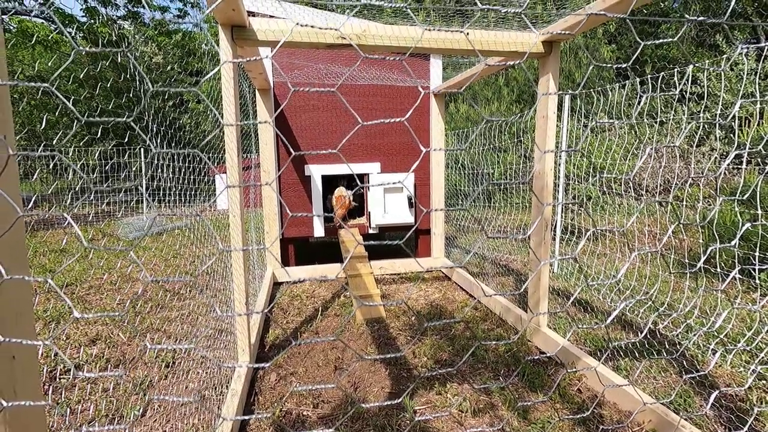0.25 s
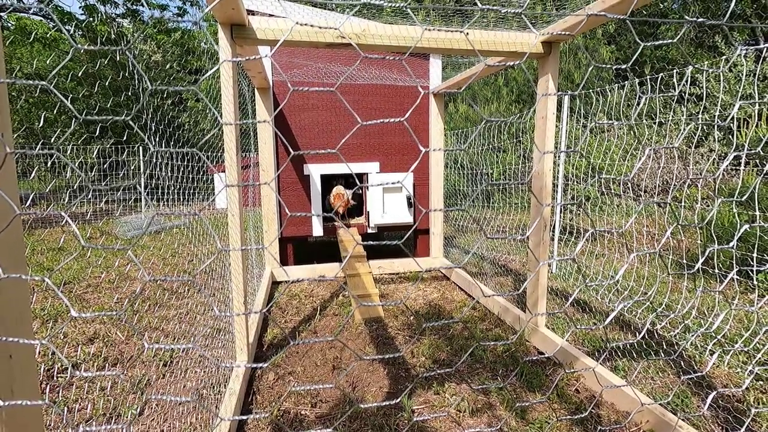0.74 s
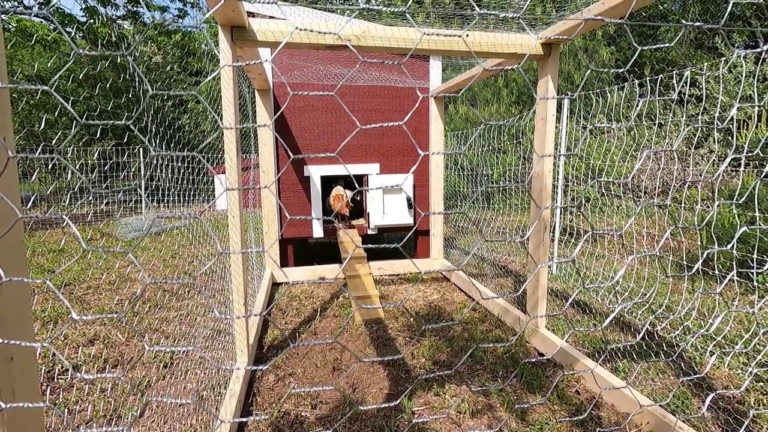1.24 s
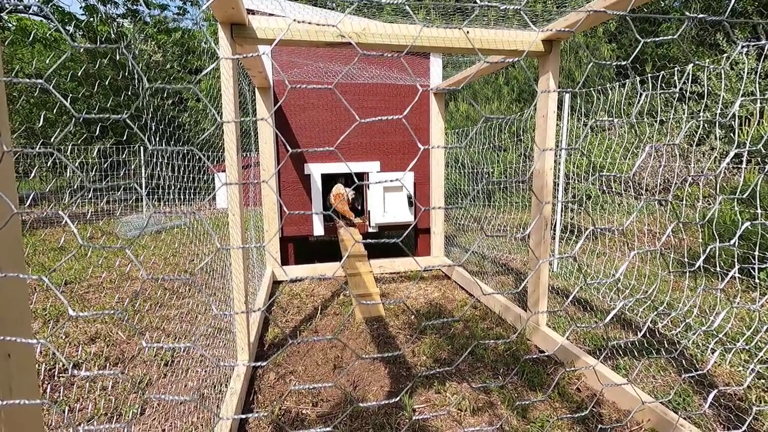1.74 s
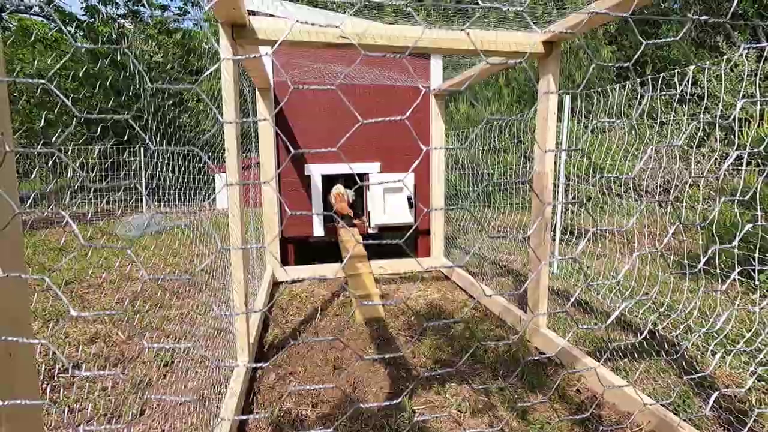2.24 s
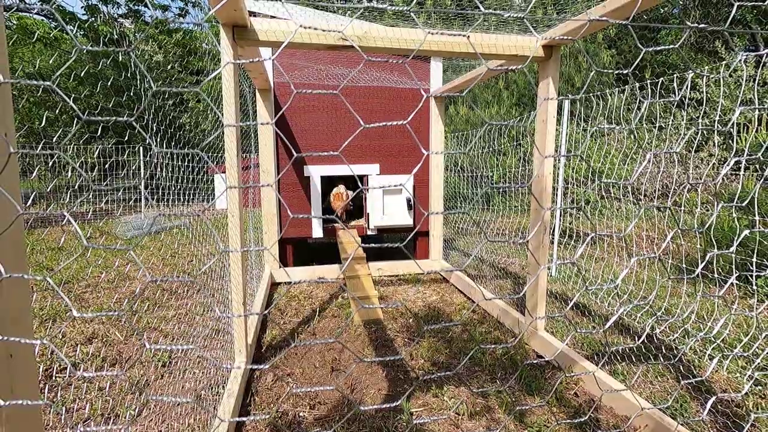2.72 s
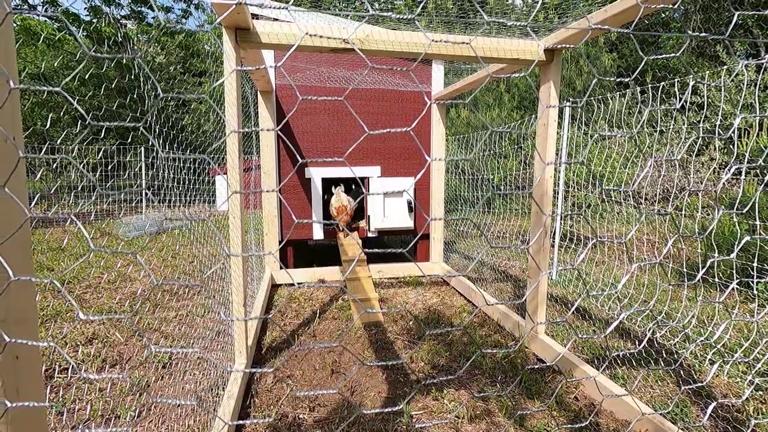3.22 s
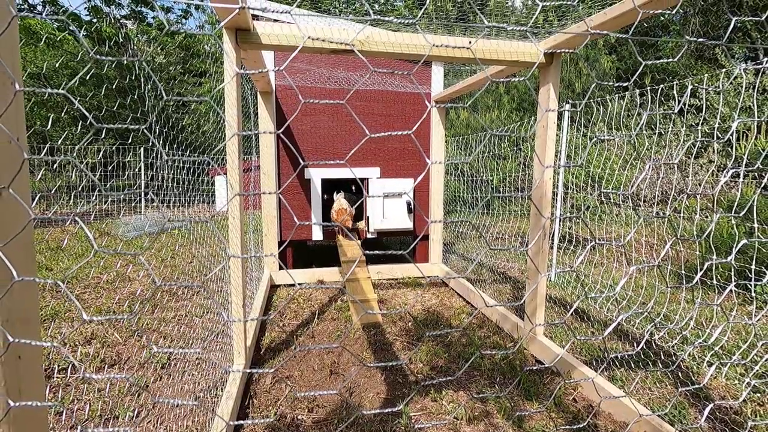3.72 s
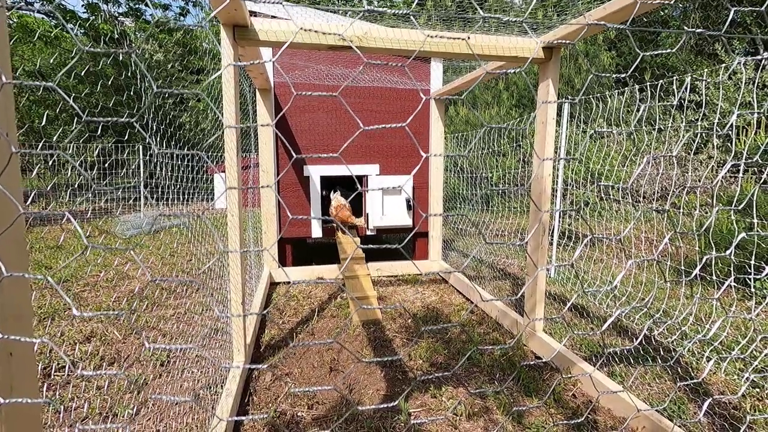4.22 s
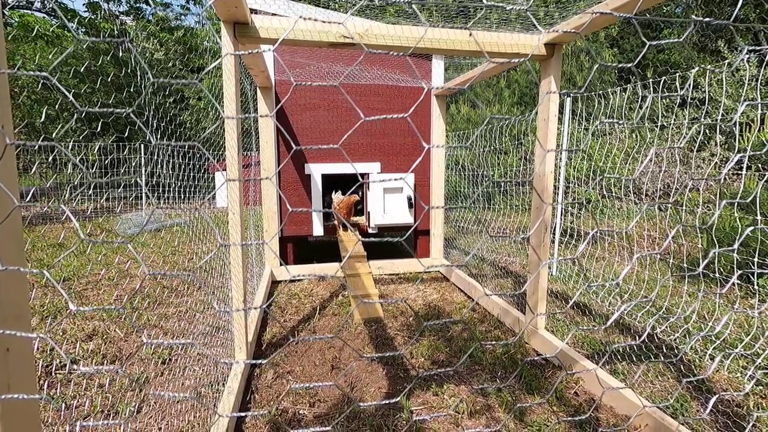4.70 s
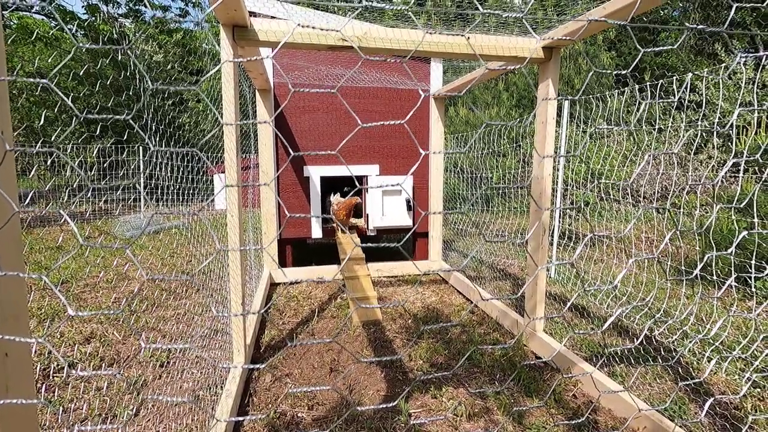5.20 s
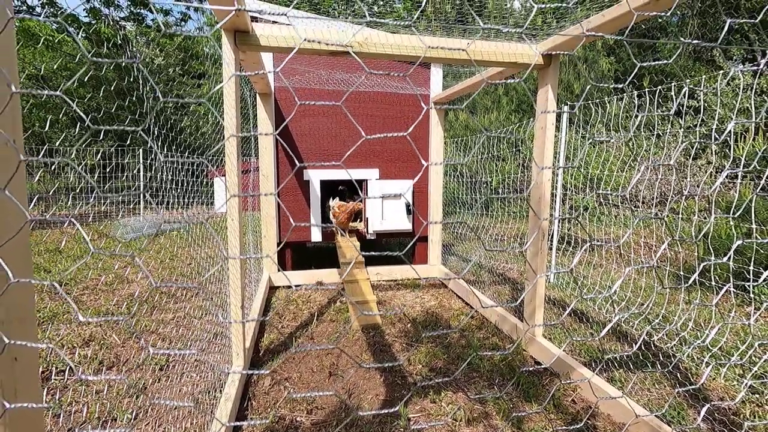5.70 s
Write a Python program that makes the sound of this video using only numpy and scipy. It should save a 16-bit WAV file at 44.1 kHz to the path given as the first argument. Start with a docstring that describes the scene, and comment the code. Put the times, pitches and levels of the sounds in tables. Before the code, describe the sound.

Overlapping short chick cheeps and soft peeps, light taps and litter scratches, over rustling foliage, faint cricket, distant engine hum and microphone wind.

```python
'''In and around a small wooden coop, young chickens peep and cheep; claws and beaks tick and scratch on the boards.
Each call is a gliding near-sine with overtones, buzz and hiss; taps are noise ticks with ringing boards.
Scratches are bursts of crackling noise over a soft boom, and the box adds quick reflections to calls and taps.
Outdoors, filtered noise makes rustling leaves, a cricket near 5 kHz and light wind rumbling on the microphone;
a far engine hums on one wavering tone.'''
import sys
import numpy as np
from scipy import signal
from scipy.fft import rfft, irfft, next_fast_len
from scipy.io import wavfile
from scipy.ndimage import uniform_filter1d, map_coordinates

SR = 44100
rng = np.random.default_rng(int(sys.argv[2]) if len(sys.argv) > 2 else 0)


def persist_wave(psi):
    """Save psi, clipped to +-1, as 16-bit WAV."""
    counts = np.round(np.clip(psi, -1, 1) * 32767).astype(np.int16)
    wavfile.write(sys.argv[1], SR, np.atleast_2d(counts).T)


N = 262388
TIME = np.arange(N) / SR  # s

# bright spectrum of claws and beaks on wood and litter: f/Hz, relative level/dB
CLAW = [(1500, -17), (3000, 5), (5000, 1.5), (7000, 0.5), (9500, -9), (12500, -10)]


def from_db(db):
    """Decibels to gain."""
    return 10 ** (np.asarray(db) / 20)


def rms_one(x):
    """Scale to unit rms."""
    return x / np.sqrt(np.mean(x ** 2) + 1e-20)


def in_time(rows):
    """Draw each column of an automation curve at every sample."""
    s, *columns = np.transpose(rows)
    return [np.interp(TIME, s, c) for c in columns]


def at_hz(points, hz):
    """Read a spectrum on a log-frequency axis."""
    f, value = np.transpose(points)
    return np.interp(np.log(hz + 1e-6), np.log(f), value)


def drift(rate, size=N):
    """Random modulator of spread 1, gliding to a new value rate times a second."""
    steps = np.arange(size) * rate / SR
    values = rng.standard_normal(size // 8 + 9)
    # straight glides between values shrink the spread, so restore it
    return map_coordinates(values, [steps + 2], order=1, mode="wrap") * np.sqrt(3 / 2)


def colour(x, spectrum):
    """Filter by a spectrum that falls away steeply past its ends."""
    size = next_fast_len(N)
    hz = np.arange(size // 2 + 1) * SR / size + 1e-3
    low_end = 1 + (.8 * spectrum[0][0] / hz) ** 8
    high_end = 1 + (.8 * hz / spectrum[-1][0]) ** 8
    gain = from_db(at_hz(spectrum, hz)) / np.sqrt(low_end * high_end)
    return irfft(rfft(x, size) * gain, size)[..., :N]


def diffuse(spectrum, grain_db=0):
    """Stereo noise of rms 1, alike in the bass and wider above; grain makes it crackle."""
    # likeness of left and right: f/Hz, correlation/1
    likeness = [(60, 1), (125, 0.99), (250, 0.88), (500, 0.57), (1000, 0.79), (2000, 0.3), (4000, 0.46),
                (12000, 0.62)]
    grains = rng.standard_normal((2, N)) * from_db(grain_db * drift(900))
    mid, side = colour(grains, spectrum)
    width = [(hz, 10 * np.log10((1 - min(c, .999)) / (1 + c))) for hz, c in likeness]
    side = colour(side, [(10, width[0][1])] + width)
    return rms_one(mid + side * np.array([[1], [-1]]))


def add(track, start, sound):
    """Mix a sound into a track at a time in seconds."""
    i = max(round(start * SR), 0)
    track[i:i + len(sound)] += sound[:max(N - i, 0)]


def progress(length):
    """From 0 to 1 over a length in seconds."""
    return np.linspace(0, 1, int(length * SR))


def swell(u, loudest_at, ends_db):
    """A call's effort in dB: up to its loudest moment and down again."""
    return np.interp(u, [0, np.clip(loudest_at, .02, .98), 1], [ends_db[0], 0, ends_db[1]])


def chicks():
    """All the birds' calls overlap freely and share the colour of throat and beak."""
    # how throat and beak colour the voice: f/Hz, gain/dB
    beak = [(900, 2), (3800, -2), (5000, -2), (6800, -3), (8600, -4), (9800, -9.5), (11500, 1.5),
            (13000, -19)]
    return colour(arched_peeps() + falling_cheeps() + twisting_pips(), beak)


def falling_cheeps():
    """Cheeps start high and slide down in one slightly bowed line."""
    # cheeps: t/s, length/s, start f/Hz, end f/Hz, bow of the glide/Hz, nominal level/dB,
    # loudest moment/0-1, nominal overtones/dB, rasp/0-1
    cheeps = [(0, 0.038, 2550, 2250, 30, -58, .3, -22, 0.04),
              (0.634, 0.12, 4230, 2310, -330, -41, .48, -17, .25),
              (.933, 0.049, 2970, 1980, -170, -41, 0.67, -25, 0.24),
              (1.144, 0.063, 2870, 2030, -130, -44, .5, -16, 0.7),
              (1.624, .11, 3850, 2295, -140, -40.5, 0.71, -9, .36),
              (1.77, 0.042, 3060, 2210, 100, -52, .6, -24, 0.4),
              (2.028, 0.026, 2890, 2050, 30, -49, .4, -7, 0.2),
              (2.3, 0.14, 4200, 1995, -40, -45.5, 0.41, -12, 0.24),
              (2.545, 0.065, 4700, 4230, 0, -52, 0.65, -28, .6),
              (2.598, .08, 4470, 2150, 29, -41, 0.9, -23, 0.33),
              (2.7, 0.071, 3150, 2280, 98, -45, 0.75, -18, 0.08),
              (2.978, 0.05, 2890, 1980, -170, -46, 0.66, -14, 0.3),
              (3.025, 0.064, 2930, 2240, -130, -37.5, 0.66, -18, .6),
              (3.035, 0.089, 5000, 3730, -74, -48, 0.9, -25, 0.8),
              (3.088, 0.11, 3800, 2360, -190, -37.5, 0.64, -10.5, 0.3),
              (3.287, 0.074, 5000, 3200, 203, -45, 1, -26, .85),
              (3.34, 0.026, 2050, 1830, -30, -36, .24, -20, .22),
              (3.361, .038, 3320, 2640, 140, -33.5, 0.62, -24, 0.27),
              (3.549, 0.097, 4220, 2210, 253, -39, .72, -25, 0.5),
              (3.991, 0.017, 2304, 1650, 0, -42.5, 0.75, -18, 0.55),
              (4.071, 0.056, 3100, 2690, 70, -46, 0.5, -17, 0.2),
              (4.084, 0.14, 3430, 2760, 104, -49, 0.2, -14, 0.05),
              (4.21, .049, 2750, 1765, 93, -34.5, 0.41, -13, 0.39),
              (4.455, 0.038, 2420, 1362, 24, -42.5, 0.94, -11, 0.7),
              (4.608, 0.07, 3510, 1900, -19, -42.5, 0.3, -12, 0.58),
              (4.65, 0.039, 3560, 2160, 128, -45, 0.15, -7, 0.5),
              (4.808, .011, 2160, 1950, -20, -45.5, 0.3, -29, 0),
              (5.191, 0.032, 1860, 1650, 110, -41, 0.57, -20, 0.1),
              (5.252, .07, 2840, 2400, -60, -48, 0, -12, .3),
              (5.456, 0.068, 3680, 2450, -56, -44, 0.97, -11.5, 0.65),
              (5.61, 0.041, 2810, 2130, 20, -39, 0.4, -22, 0.34),
              (5.854, 0.032, 2920, 2240, 0, -49.5, 0.15, -24, 0.45),
              (5.909, 0.039, 2900, 1950, 0, -48, 0.44, -24, 0.66)]
    out = np.zeros(N)
    for start, length, from_hz, to_hz, bow_hz, db, loudest_at, overtone_db, rasp in cheeps:
        u = progress(length)
        hz = from_hz + (to_hz - from_hz) * u + bow_hz * np.sin(np.pi * u)
        level_db = db + swell(u, loudest_at, (-13.5, -11))
        add(out, start, peep(hz, level_db, overtone_db, rasp))
    return out


def arched_peeps():
    """Soft peeps scoop up towards a top pitch, then droop ever faster."""
    # peeps: t/s, length/s, nominal top f/Hz, scoop up to it/Hz, final fall/Hz, nominal level/dB,
    # loudest moment/0-1, nominal overtones/dB, rasp/0-1
    peeps = [(0.129, 0.17, 3064, 498, 1000, -52.5, 0.8, -30, 0.28),
             (.742, 0.039, 1295, 0, 20, -47, 0.5, -30, 0.43),
             (0.908, .02, 2960, 1100, 0, -51, 0.4, -23, .1),
             (1.671, .072, 3610, 200, 430, -49, 0.78, -31, 0),
             (1.902, 0.11, 3770, 698, 700, -50, 0.8, -33, 0),
             (2.909, 0.15, 3570, 2000, 280, -55.5, 0, -11, 0.05),
             (2.969, 0.056, 3110, 500, 448, -46.5, 0.85, -21, 0.3),
             (3.185, 0.1, 3330, 900, 950, -48.5, 0.17, -15, .02),
             (3.367, .014, 3350, 2100, 0, -37, .12, -21, .55),
             (3.399, 0.019, 2880, 700, 0, -44, 0.1, -21, .4),
             (3.51, .085, 3200, 1400, 400, -53, 0, -18, .4),
             (3.741, 0.16, 3680, 1200, 1600, -47.5, 0.5, -27, 0.15),
             (3.922, 0.07, 2660, 300, 400, -53, 0.54, -4.5, 0.4),
             (4.069, 0.11, 3810, 0, 300, -54, 0.2, -20, 0.08),
             (4.134, 0.074, 2760, 200, 480, -52.5, 0.5, -16, 0.33),
             (4.312, 0.055, 2750, 290, 400, -50, 0.6, -18, 0.3),
             (4.725, 0.071, 2900, 300, 430, -47, 0.6, -20, 0),
             (4.942, 0.064, 2270, 250, 40, -46.5, 0.9, -21, 0.43),
             (5.137, .096, 3003, 1351, 680, -44.5, 0.25, -29, 0.16),
             (5.263, 0.091, 3215, 600, 950, -47.5, 0.65, -19, 0.23),
             (5.506, .112, 3100, 1396, 430, -51, 1, -13, 0.27),
             (5.65, 0.096, 2590, 450, 600, -50.5, 0.64, -11, 0.8),
             (5.753, 0.12, 3770, 1302, 1148, -52, .7, -17, 0.3),
             (5.853, 0.087, 3020, 300, 380, -48, 0.4, -26, 0.27)]
    scoop_s, fall_power = .0075, 3.2
    out = np.zeros(N)
    for start, length, top_hz, scoop_hz, fall_hz, db, loudest_at, overtone_db, rasp in peeps:
        u = progress(length)
        hz = top_hz - scoop_hz * np.exp(-u * length / scoop_s) - fall_hz * u ** fall_power
        level_db = db + swell(u, loudest_at, (-6.5, -7))
        add(out, start, peep(hz, level_db, overtone_db, rasp))
    return out


def twisting_pips(flick_hz_per_s=46000, hook_hz_per_s=65500, loudest_at=0.83):
    """Pips flick up to a crest, drop to a trough and hook upward; the upward moves have fixed speeds."""
    # pips: t/s, flick/s, drop/s, hook/s, crest f/Hz, trough f/Hz, easing of the drop/power,
    # nominal level/dB, nominal overtones/dB, rasp/0-1
    pips = [(.117, 0.0093, 0.028, 0.013, 2120, 1847, 1.8, -43, -36, .13),
            (1.301, 0.0093, .04, 0.011, 2900, 2040, 2.1, -39.5, -16, 0.1),
            (2.107, 0.0085, 0.051, .004, 2900, 2020, 3.3, -44, -23, 0.14),
            (2.634, 0.00334, .039, 0.019, 2520, 1612, 1, -38, -12.5, 0.45),
            (4.53, 0.018, 0.03, 0.0024, 2720, 2040, 1.04, -43, -14.5, 0.08)]
    out = np.zeros(N)
    for start, flick_s, drop_s, hook_s, crest_hz, trough_hz, easing, db, overtone_db, rasp in pips:
        length = flick_s + drop_s + hook_s
        u = progress(length)
        t = u * length - flick_s  # zero at the crest
        hz = trough_hz + (crest_hz - trough_hz) * np.clip(1 - t / drop_s, 0, 1) ** easing
        hz += flick_hz_per_s * np.minimum(t, 0) + hook_hz_per_s * np.maximum(t - drop_s, 0)
        level_db = db + swell(u, loudest_at, (-4.5, -10.5))
        add(out, start, peep(hz, level_db, overtone_db, rasp))
    return out


def peep(hz, level_db, overtone_db, rasp):
    """One whistle of the syrinx: a gliding near-sine that trembles when hoarse and turns to hiss when high."""
    # overtones from the octave upward: relative level/dB
    overtones = [-3, -8.5, -12, -37]
    # the call rings out as its pitch passes these resonances: f/Hz, gain/dB
    resonances = [(1400, 5), (1750, -2), (2050, 3.5), (2400, 0), (2750, 0.5), (3050, 1.5), (3600, -2.5),
                  (5000, 1.5)]
    quaver, quaver_rate, jitter, rasp_rate = 0.0048, 170, 0.051, 520  # fractions of the pitch, changes per s
    flutter_db, flutter_rate, shimmer_db = 2.2, 170, 5.5
    bloom, mellowing, overtone_flutter_db = 0.15, .22, 4.5
    airy_hz, airy_span_hz, edge_s = 3300, 3000, 0.0033
    buzz_hz, buzz_depth = 483, 0.55
    size, rasp = len(hz), np.clip(rasp, 0, 1)
    t = TIME[:size]

    tremble = quaver * drift(quaver_rate, size) + jitter * rasp * drift(rasp_rate, size)
    phase = 2 * np.pi * np.cumsum(hz * (1 + tremble)) / SR
    level_db = level_db + at_hz(resonances, hz) + flutter_db * np.tanh(drift(flutter_rate, size))

    # overtones bloom where the bird pushes hardest
    bright_db = overtone_db + bloom * (level_db - level_db.max())
    tone = np.sin(phase)
    for k, db in enumerate(overtones):
        flutter = overtone_flutter_db * np.tanh(drift(184, size))
        tone += from_db(bright_db * (1 + mellowing * k) + db + flutter) * np.sin((k + 2) * phase)

    # hiss is noise centred on the whistle's own pitch
    airy = np.clip(rasp * (0.051 + 10 * np.maximum(hz - airy_hz, 0) / airy_span_hz), 0, .95)
    hiss = (drift(1700, size) * np.sin(phase) + drift(1700, size) * np.cos(phase)) / np.sqrt(2)
    voice = np.sqrt(1 - airy) * tone + np.sqrt(airy) * hiss

    # a hoarse syrinx also buzzes, which splits the whistle into parallel strands
    buzz = np.sin(2 * np.pi * np.cumsum(buzz_hz * (1 + 0.112 * drift(119.6, size))) / SR)
    voice = voice * (1 + buzz_depth * rasp * buzz)

    edges = np.sin(np.pi / 2 * np.clip(np.minimum(t, t[-1] - t) / edge_s, 0, 1))
    shimmer = shimmer_db * rasp * (np.tanh(drift(rasp_rate, size)) - 1.5)
    return voice * edges * from_db(level_db + shimmer)


def taps(tick_t60=0.018, crack_db=10, crack_t60=0.0028):
    """Each tap is a sharp crack, a bright tick and a short ring of the board, different with every blow."""
    # beak and claw blows: t/s, nominal tick level/dB, nominal board knock level/dB
    blows = [(.177, -55, -72), (.996, -63, -45.5), (1.184, -56, -70), (1.518, -52, -65), (2.044, -68, -68),
             (2.762, -55, -64), (2.818, -64, -62), (3.019, -54, -62), (3.296, -73, -51), (3.347, -60, -39),
             (3.367, -65, -46), (3.517, -72, -43), (4.0, -59, -55), (4.091, -59, -48), (4.657, -56, -63),
             (5.236, -62, -53), (5.485, -58.5, -73), (5.768, -58, -68)]
    # ring of the boards: f/Hz, relative level/dB, t60/s
    board = [(440, -17, 0.048), (694, -5.5, 0.014), (1280, -19, 0.014), (1600, -1, 0.011),
             (1970, -4, 0.051), (2770, -5.5, 0.025)]
    ticks, knocks, t = np.zeros(N), np.zeros(N), TIME[:SR // 10]
    fade = from_db(crack_db - 60 * t / crack_t60) + from_db(-60 * t / tick_t60)
    for start, tick_db, knock_db in blows:
        add(ticks, start, from_db(tick_db) * fade * rng.standard_normal(len(t)))
        for hz, db, t60 in board:
            ring_db = knock_db + db + rng.normal(0, 0.83) - 60 * t / t60
            ring = from_db(ring_db) * np.sin(2 * np.pi * hz * t)
            add(knocks, start, ring * rng.choice([-1, 1]))
    return colour(ticks, CLAW) + knocks


def scratches(boom_db=-4, boom_s=0.12):
    """Short strokes of crackling litter, under which the floor booms faintly."""
    # strokes: middle t/s, nominal length/s, level/dB
    strokes = [(1.196, 0.083, -63.5), (2.64, 0.076, -61), (2.74, 0.11, -64), (2.82, .04, -59.5),
               (3.03, 0.24, -69), (3.405, 0.46, -64), (3.596, 0.14, -83), (3.87, 0.18, -66),
               (4.086, 0.083, -55), (4.18, 0.074, -60), (4.39, 0.22, -68.5), (4.639, 0.11, -62.5),
               (5.21, 0.22, -68.5), (5.598, 0.47, -71)]
    # hollow boom of the coop floor: f/Hz, relative level/dB
    floor = [(190, -2.5), (260, 3.5), (340, -11)]
    stroke, boom_power = np.zeros(N), np.zeros(N)
    for middle, length, db in strokes:
        stroke += from_db(db) * np.exp(-2 * ((TIME - middle) / length * 1.83) ** 2)
        boom_power += from_db(db) ** 2 * np.exp(-((TIME - middle) / boom_s) ** 2)
    litter = stroke * diffuse(CLAW, grain_db=2.0)
    return litter + from_db(boom_db) * np.sqrt(boom_power) * diffuse(floor)


def coop(x, wet_db=-14, spread_db=-2, t60_s=0.11):
    """The bare wooden box adds a quick spray of reflections, partly different at each ear."""
    t = TIME[:SR // 4]
    sparse = rng.standard_normal((3, len(t))) * (rng.random((3, len(t))) < .05)
    echoes = sparse * from_db(-60 * t / t60_s) * (t > .002)
    echoes /= np.sqrt(np.sum(echoes ** 2, axis=1, keepdims=True))
    walls = echoes[0] + from_db(spread_db) * echoes[1:]  # one shared spray, one for each ear
    return x + from_db(wet_db) * signal.fftconvolve(x[None], walls, axes=1)[:, :N]


def placed(x):
    """Phase shifts make the coop's sound reach the right channel slightly before the left."""
    # phase by which the left channel leads (negative: lags): f/Hz, phase/rad
    lead_curve = [(500, -.1), (1800, -0.25), (3000, -0.73), (4500, -0.43), (8000, -0.82), (11000, -0.56)]
    size = next_fast_len(N)
    lead = at_hz(lead_curve, np.arange(size // 2 + 1) * SR / size)
    return irfft(rfft(x, size) * np.exp(.5j * lead * np.array([[1], [-1]])), size)[:, :N]


def wind(steadiness=0.5):
    """Low eddies at the microphone: a slowly changing draught with short buffets on top."""
    # rumble of the eddies: f/Hz, relative level/dB
    rumble = [(18, -17.5), (45, 1), (60, 1), (85, 2), (110, -7), (135, -7), (190, -22.5)]
    # draught between buffets: t/s, nominal level/dB
    draught = [(0, -56), (.08, -47), (.5, -45.5), (1.15, -42.5), (1.6, -47), (2, -47), (2.8, -49),
               (3.3, -46.5), (3.9, -48.5), (4.35, -41.5), (4.52, -53.5), (5.1, -46.5), (5.95, -45.5)]
    # single buffets: middle t/s, nominal level/dB
    buffets = [(.25, -42), (.7, -40), (.87, -43.5), (1.69, -41), (1.83, -41), (3.06, -42.5), (3.16, -41.5),
               (4.22, -42.5), (4.62, -40), (4.79, -44), (5.29, -38.5), (5.65, -34.5), (5.84, -38.5)]
    buffet_s = .036
    eddies = diffuse(rumble)
    # partly even out the noise's own swells, so the drawn levels lead
    strength = np.sqrt(uniform_filter1d(eddies[0] ** 2, size=SR // 12) + 1e-9)
    power = from_db(in_time(draught)[0]) ** 2
    for middle, db in buffets:
        power += from_db(db) ** 2 * np.exp(-((TIME - middle) / buffet_s) ** 2)
    return np.sqrt(power) * eddies / strength ** steadiness


def engine(waver=0.009, flutter_db=1.7):
    """A far engine: one wavering low tone."""
    # hum before waver and flutter: t/s, f/Hz, level/dB
    hum = [(0, 150, -58.5), (1.3, 156, -67), (1.9, 158, -54.5), (2.4, 152, -56), (2.9, 157, -55),
           (3.4, 160, -55.5), (3.9, 152, -63), (4.3, 153, -53), (4.8, 160, -54), (5.2, 164, -47.5),
           (5.6, 168, -54.5), (5.95, 173, -58.5)]
    hz, db = in_time(hum)
    phase = 2 * np.pi * np.cumsum(hz * (1 + waver * drift(14))) / SR
    return from_db(db + flutter_db * drift(11)) * np.sqrt(2) * np.sin(phase)


def insects(chirp_db=-68.0, chirp_s=0.056, flutter_db=3.0, stray_s=0.006, chorus=0.6):
    """A cricket chirps about four times a second over a far chorus, both as noise at the wing's resonance."""
    # bouts of nearly even chirping: first chirp t/s, last chirp t/s, period/s
    bouts = [(.15, 1.86, 0.2454), (2.419, 5.88, .231)]
    # wing resonance: f/Hz, relative level/dB
    wing = [(4100, -36), (4550, -14), (4820, -5), (5020, 0), (5200, -6), (5500, -15), (6000, -40)]
    times = np.concatenate([np.arange(first, last + period / 2, period) for first, last, period in bouts])
    times = times + stray_s * rng.standard_normal(len(times))
    chirps = chorus + sum(np.exp(-np.abs((TIME - s) / chirp_s) ** 3) for s in times)
    return from_db(chirp_db + flutter_db * drift(90)) * chirps * diffuse(wing, grain_db=0.5)


def trees(air_db=-56, lean_db=0.7):
    """Far foliage in the breeze, a few nearer swells and a steady outdoor background, all as noise."""
    # spectra of far leaves, nearer rustling and open air: f/Hz, relative level/dB
    leaves = [(300, -31), (500, -18), (750, -8.5), (950, 4.5), (1250, 5), (1650, -1.5), (2050, -7.5),
              (2700, -25), (4000, -49)]
    swish = [(170, 3.5), (260, 7.5), (400, -6), (600, -1.5), (880, 3.5), (1300, -3.5), (2200, -8.5),
             (4500, -31.5)]
    air = [(110, 0.5), (170, 11.5), (240, 4), (310, -5.5), (400, -13.5), (520, -7.5), (800, -12),
           (1100, -4), (1900, -11.5), (3000, -16), (4000, -20), (5400, -18.5), (6200, -25), (7300, -26.5),
           (9000, -34), (12500, -37.5)]
    # breeze in the far trees, and nearer swells of rustling: t/s, level before a 1 dB trim/dB
    breeze = [(0, -52), (.4, -54.5), (.8, -52), (1.3, -52), (1.8, -52), (2.3, -55), (2.8, -55),
              (3.3, -58.5), (3.8, -59), (4.3, -57.5), (5, -63.5), (5.95, -70)]
    swells = [(0, -60), (.15, -55), (.3, -49), (.5, -50.5), (.8, -63.5), (1.7, -56.5), (2.2, -68),
              (2.7, -53.5), (3.1, -79), (3.9, -70), (4.05, -48.5), (4.2, -53), (4.35, -63.5), (5.95, -63.5)]
    far = from_db(in_time(breeze)[0] - 1.0) * diffuse(leaves, grain_db=1.0)
    near = from_db(in_time(swells)[0] - 1.0) * diffuse(swish, grain_db=3.0)
    return (far + near + from_db(air_db) * diffuse(air)) * from_db([[lean_db], [-lean_db]])


def scene(pan_db=0.26):
    """The coop near the centre, with the outdoors around it."""
    birds = placed(coop(chicks() + taps())) + scratches()
    outdoors = trees() + insects() + engine() + wind()
    return birds * from_db([[pan_db], [-pan_db]]) + outdoors


def record(dry, cutoff_hz=12700):
    """A steep low-pass cuts the top."""
    return signal.sosfilt(signal.ellip(12, .1, 80, cutoff_hz, fs=SR, output="sos"), dry)


dry = scene()
out = record(dry)
persist_wave(out)
```